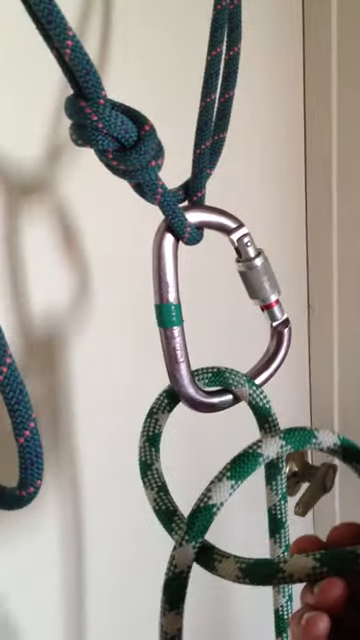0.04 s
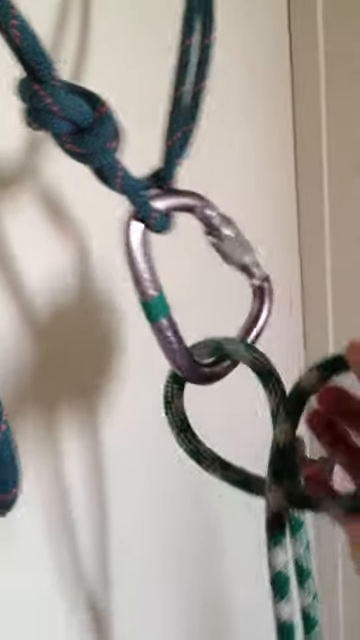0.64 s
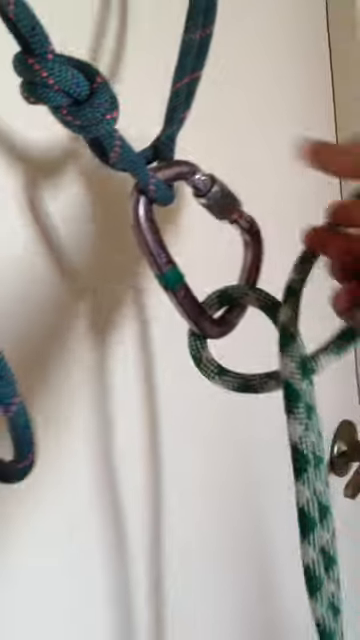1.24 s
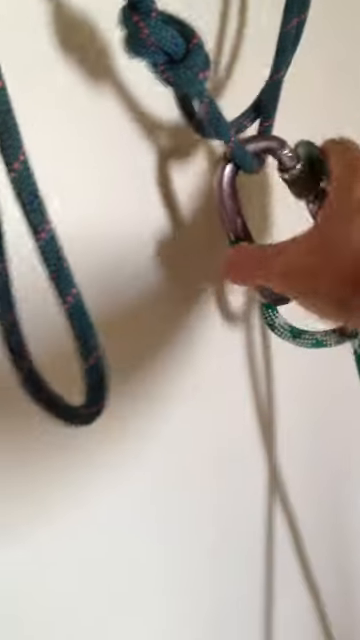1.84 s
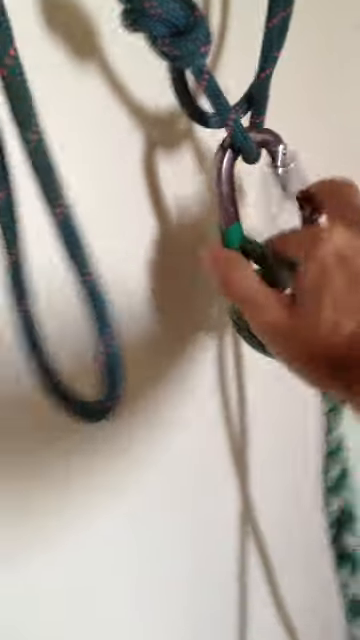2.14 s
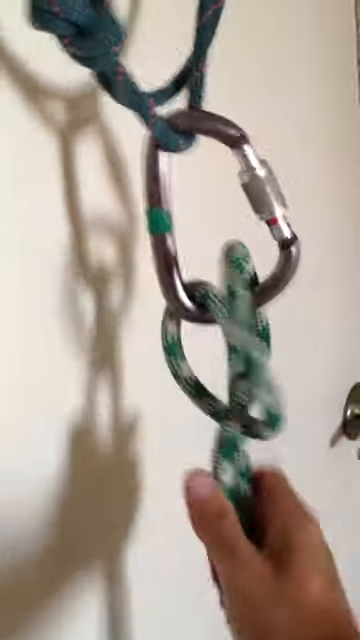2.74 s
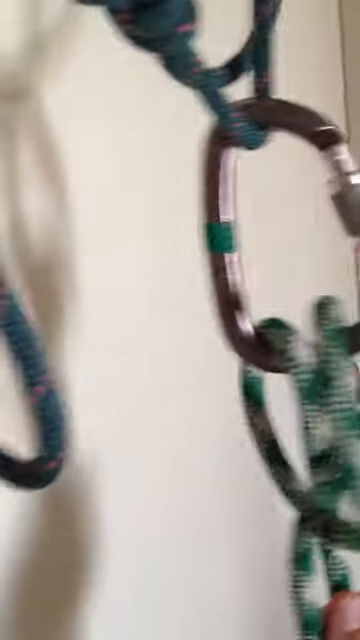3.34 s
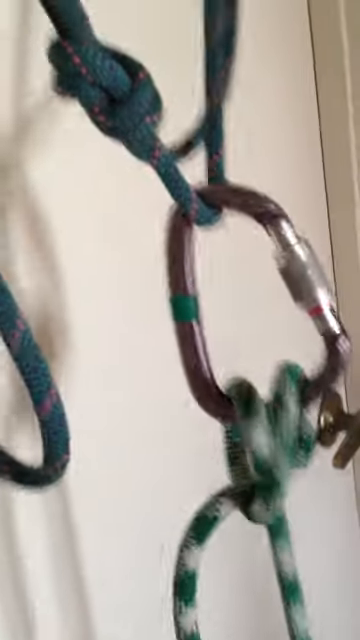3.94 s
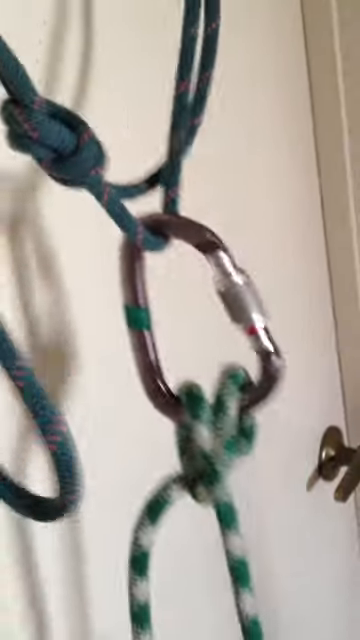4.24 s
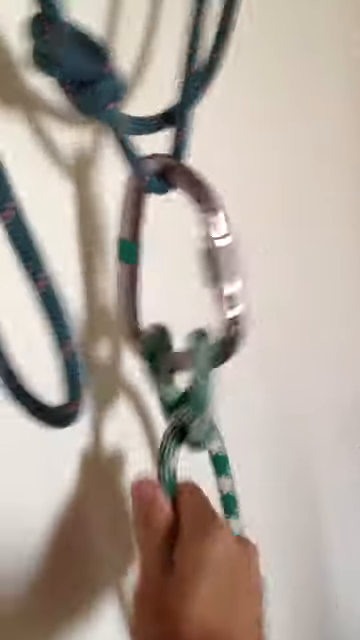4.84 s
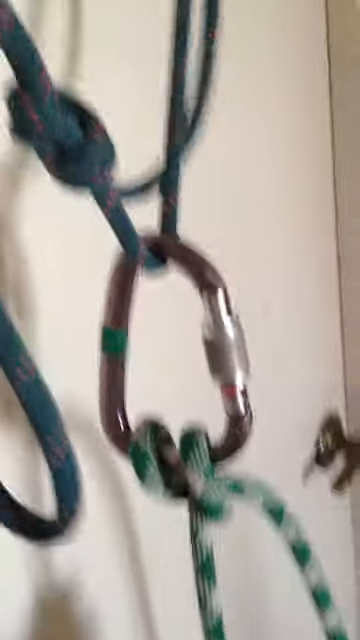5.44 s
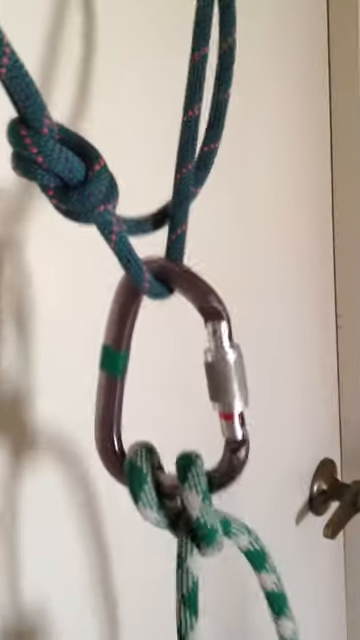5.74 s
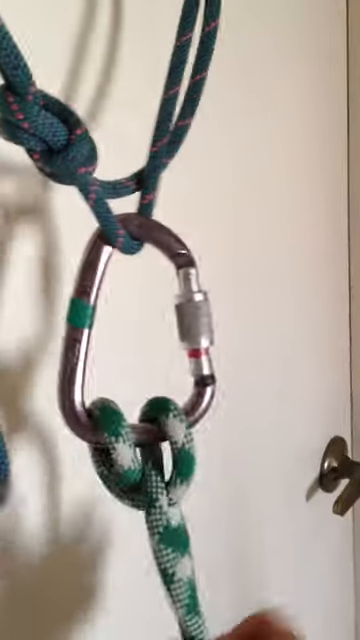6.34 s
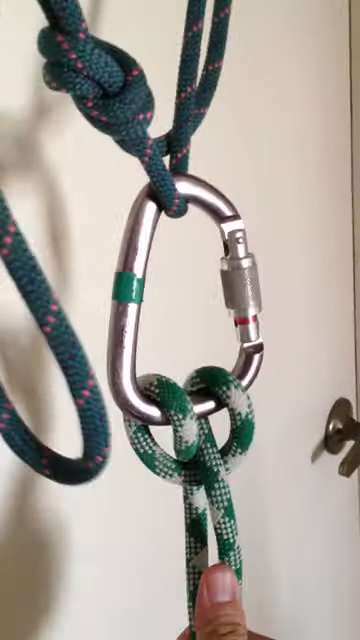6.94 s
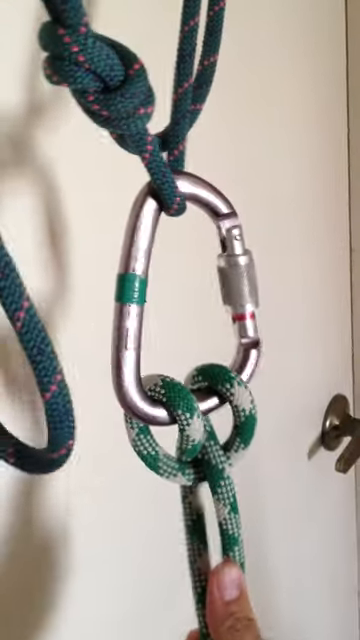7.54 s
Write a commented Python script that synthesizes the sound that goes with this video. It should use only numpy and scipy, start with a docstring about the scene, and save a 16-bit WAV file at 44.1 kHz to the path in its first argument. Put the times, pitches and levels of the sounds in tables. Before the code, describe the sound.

One loud, bright snap of a carabiner closing, amid faint rope sliding and light bumps on a wooden door in a quiet room.

```python
"""Hitching a rope to a carabiner

A rope is tied into a metal carabiner that hangs against a door in a small, quiet room.
The rope hisses over the metal, rustles in the hand, and scrapes and slaps the door. The metal clinks.
Once, close by, the spring gate snaps shut, and an automatic gain control turns the room noise
down for about a second."""
import sys
import numpy as np
from scipy import signal
from scipy.fft import rfft, irfft
from scipy.io import wavfile
from scipy.ndimage import uniform_filter1d, minimum_filter1d

SR = 44100
rng = np.random.default_rng(int(sys.argv[2]) if len(sys.argv) > 2 else 0)


def wrap_up_sound(samples):
    """Save the sound to the file named by the first command line argument, as 16-bit audio."""
    columns = np.atleast_2d(samples).T
    # keep every value between -1 and 1, then stretch to whole-number steps
    tamed = np.clip(columns, -1, 1)
    steps = np.round(tamed * 32767).astype(np.int16)
    wavfile.write(sys.argv[1], SR, steps)


N = 340011
TIME = np.arange(N) / SR
RING_TIME = TIME[:SR // 2]  # half a second, for short sounds


def gain_of(db):
    return 10 ** (np.asarray(db) / 20)


def unit_level(x):
    """Scales a sound to an average power of 1."""
    return x / np.sqrt(np.mean(x ** 2) + 1e-20)


def look_up(table, hz):
    """Reads between a table's rows, along a musical (log) pitch scale."""
    pitch_hz, value = np.transpose(table)
    return np.interp(np.log(hz + 1), np.log(pitch_hz + 1), value)


def add(mix, start_s, sound):
    part = mix[round(start_s * SR):][:len(sound)]
    part += sound[:len(part)]


def coloured(x, tone):
    """Makes each pitch stronger or weaker as a tone table says; the result has power 1."""
    gains = gain_of(look_up(tone, np.fft.rfftfreq(len(x), 1 / SR)))
    return unit_level(irfft(rfft(x) * gains, len(x)))


def keep_side(x, hz, side, order=2):
    """Keeps the "low" or the "high" side of a pitch."""
    return signal.sosfilt(signal.butter(order, min(hz, SR / 2 - 1), side, fs=SR, output="sos"), x)


def dying(decay_s):
    """A fade that loses 60 dB in decay_s."""
    return np.exp(-np.log(1000) * RING_TIME / decay_s)


def ring(notes):
    """A struck object sounds several fading notes at once."""
    return sum(gain_of(db) * dying(decay_s) * np.sin(2 * np.pi * hz * RING_TIME)
               for hz, db, decay_s in notes)


def scatter(spacing=8):
    """Dense tiny echoes: one click, up or down at random, in every few samples."""
    clicks = np.zeros(len(RING_TIME))
    slots = np.arange(0, len(clicks) - spacing, spacing)
    clicks[slots + rng.integers(0, spacing, len(slots))] = rng.choice([-1., 1.], len(slots))
    return unit_level(clicks)


def slips(per_s, spread_db):
    """Rubbing: tiny random slips of uneven size."""
    size = gain_of(spread_db * np.minimum(rng.exponential(1, N), 4))
    return unit_level(size * rng.standard_normal(N) * (rng.random(N) < per_s / SR))


def stroke(start_s, length_s, end_db, swell_db, fade_s, attack_s=.035):
    """Loudness of one rope move: it starts, swells to end_db, then loses 20 dB every fade_s."""
    t = np.maximum(TIME - start_s, 0)
    swelling_db = swell_db * (np.minimum(t / length_s, 1) - 1)
    fading_db = 20 * np.maximum(t - length_s, 0) / fade_s
    return np.minimum(t / attack_s, 1) * gain_of(end_db + swelling_db - fading_db)


# Tone of the room noise: pitch_hz, level_db
NOISE_TONE = [(20, -51), (55, -33.5), (85, -21), (120, -8.5), (200, -8), (290, -11), (460, -11.5),
              (900, -15), (1500, -19.5), (3000, -22.5), (8000, -24), (10000, -31.5), (13000, -24.5),
              (15300, -25)]
# Pitches that stand out in it: pitch_hz, width_hz, level_db
NOISE_PEAKS = [(202.68, 18, -76.5), (243.24, 40, -74), (344.7, 29, -81), (388.97, 18, -79),
               (630.4, 22, -82), (4600, 260, -90)]
def room_noise(level_db=-69.5):
    """Steady room noise and microphone hiss, with a few broad resonances."""
    out = gain_of(level_db) * coloured(rng.standard_normal(N), NOISE_TONE)
    hz = np.fft.rfftfreq(N, 1 / SR)
    for pitch_hz, width_hz, db in NOISE_PEAKS:
        peak = rfft(rng.standard_normal(N)) / (1 + ((hz - pitch_hz) / width_hz) ** 2)
        out += gain_of(db) * unit_level(irfft(peak, N))
    return out


# How long the room echoes: pitch_hz, decay_s
ECHO_TIMES = [(250, .52), (1000, .47), (2500, .44), (4600, .52), (8000, .47), (14000, .46)]
def room_decay(x):
    """The room lets each pitch die away at its own speed."""
    hz, t, bands = signal.stft(x, SR, nperseg=256)
    fade = np.exp(-np.log(1000) * t / look_up(ECHO_TIMES, hz)[:, None])
    return signal.istft(bands * fade, SR, nperseg=256)[1][:len(x)]


# Tone of the shaking rope: pitch_hz, level_db
THRUM_TONE = [(35, -45), (68, -8), (110, -2), (180, -1), (260, -5), (500, -31), (2000, -70)]
def rope_thrum(pulling, pull_db=-10.5, lag_s=.015, knock_db=-17.5, heavy_hz=170):
    """The rope hums low just after each pull, and when a knock on the door jolts it."""
    loudness = gain_of(pull_db) * np.interp(TIME - lag_s, TIME, pulling)
    for start_s, db, low_hz, *_ in DOOR_KNOCKS:
        lighter_db = 15 * np.log2(low_hz / heavy_hz)  # higher, lighter knocks shake it less
        add(loudness, start_s, gain_of(db + knock_db - lighter_db) * dying(decay_s=.33))
    return coloured(rng.standard_normal(N), THRUM_TONE) * loudness


# Pulls over the metal: start_s, length_s, end_db, swell_db, fade_s, tightness (0 to 1)
ROPE_PULLS = [(0.362, 0.1888, -74.5, -1.5, 0.3521, 0.26), (1.415, 0.02864, -63.5, 4, 0.1194, 0.2),
              (1.481, 0.339, -76, 2.5, 0.233, 0.07), (2.035, 0.0508, -50.5, 15, 0.1529, .3),
              (2.72, .04, -74, 2, 0.1735, .2), (3.424, 0.4566, -61.5, 7, 0.1151, 0.53),
              (3.865, 0.12997, -57, -2, 0.04, .42), (4.27, .12, -75, 2.5, 0.0491, .1),
              (4.689, 0.036, -68.5, 2, 0.3443, 0.23), (4.846, 0.1022, -64.5, 4.5, 0.134, 0.28),
              (5.05, 0.0977, -58, 13, 0.2238, 0.67), (5.249, 0.09605, -66.5, 0, 0.0369, 0.92),
              (6.84, .06, -74, 3, 0.0019, .2)]
# Tone of the rope's woven cover sliding: pitch_hz, level_db
SLIDE_TONE = [(50, -26.5), (120, -12.5), (250, -13), (700, -7.5), (1800, -3), (3000, -1.7257), (4600, 1),
              (5400, -1), (7150, 1.5), (7600, 5.5), (8700, 1), (10000, -5.5), (12000, -1.5), (15300, -2.5)]
# The hand gathering rope: start_s, length_s, end_db, swell_db, fade_s
HAND_MOVES = [(0.781, 0.2258, -68, 10.5, 0.4446), (1.118, 0.0572, -69.5, 2, 0.4648),
              (1.5, .3, -77.5, 2, 0.4014), (2.03, .055, -57.5, 12, 0.1417), (2.74, .14, -78, 1, 0.1482),
              (3.552, 0.3302, -69.5, 4.5, 0.0133), (4.48, 0.1957, -72, 0, .2),
              (5.62, .13, -68.5, 7, 0.3791), (6.399, 0.0869, -70.5, 2, 1.2716),
              (7.54, .16, -76.5, 2.5, 0.5187)]
# Tone of that rustle: pitch_hz, level_db
RUSTLE_TONE = [(100, -8.5), (350, 10), (900, -4.5), (2200, -1), (3500, -7.5), (4600, -5), (8000, -8.5),
               (10000, -13.5), (15000, -19.5)]
def rope(uneven_db=1.1955, slack_hz=7986, tight_hz=6700):
    """Slack rope hisses over the metal, tight rope rasps lower; it also rustles and thrums."""
    pull_power = np.array([stroke(*row[:-1]) for row in ROPE_PULLS]) ** 2
    tightness = np.clip([row[-1] for row in ROPE_PULLS], 0, 1)
    handling = np.linalg.norm([stroke(*row) for row in HAND_MOVES], axis=0)
    catching = unit_level(keep_side(rng.standard_normal(N), 35, "low"))  # the weave grips and lets go
    fibres = coloured(slips(per_s=18000, spread_db=1.3), SLIDE_TONE)
    weave = coloured(slips(per_s=9000, spread_db=2.2), SLIDE_TONE)
    rustle = coloured(slips(per_s=6000, spread_db=2.5), RUSTLE_TONE) * handling
    hiss = unit_level(keep_side(fibres, slack_hz, "high")) * np.sqrt((1 - tightness) @ pull_power)
    rasp = unit_level(keep_side(weave, tight_hz, "low")) * np.sqrt(tightness @ pull_power)
    thrum = rope_thrum(np.sqrt(pull_power.sum(0)))
    return gain_of(uneven_db * catching) * (hiss + rasp + rustle) + thrum


# The door's own notes: pitch_hz, level_db, decay_s
DOOR_NOTES = [(239, -3, 0.11), (343, -3, 0.14), (493.03, -3, .14), (657, -2, .12), (712.47, -1, .1),
              (1200, -13, .05), (1560, -5, .06), (1310, 4.5, .065), (1640.8, -3, .08), (2107, -7, 0.06),
              (2290, -8, .1), (2466, -9, .11), (2853, -10, .1), (3494, -14, .07)]
def door_ring():
    """The wooden panel rings briefly when touched."""
    return ring(DOOR_NOTES)


# Rope dragging on the door: start_s, length_s, end_db, swell_db, fade_s, first_brightness_hz
DOOR_DRAGS = [(0.253, 0.03412, -62.5, 12.5, 0.1344, 1152), (4.733, 0.0314, -57, 3, 0.0519, 2596),
              (4.858, .06, -52.5, -1, .09, 2750), (4.925, .028, -48.5, 8, .075, 1750)]
# Tone of rope rubbing wood: pitch_hz, level_db
SCRAPE_TONE = [(30, -50), (100, -30), (300, -0.5), (600, 6.5), (1000, 1), (2300, 1.5), (5000, -4)]
def drags(panel_db=-17, dulling_octaves_per_s=10.319, attack_s=.004906):
    """The rope sticks and slips on the door, sounding duller as it slows."""
    rubbing = slips(per_s=7000, spread_db=1)
    panel = unit_level(signal.oaconvolve(rubbing, door_ring())[:N])
    wood = coloured(rubbing, SCRAPE_TONE) + gain_of(panel_db) * panel
    out = np.zeros(N)
    for start_s, *shape, first_hz in DOOR_DRAGS:
        hz, t, bands = signal.stft(wood[round(start_s * SR):][:len(RING_TIME)], SR, nperseg=256)
        bright_hz = first_hz / 2 ** (dulling_octaves_per_s * t)
        dulling = 1 / np.sqrt(1 + (hz[:, None] / bright_hz) ** 6)
        dulling /= np.sqrt(np.mean(abs(bands) ** 2, axis=1) @ dulling ** 2)  # duller, but just as loud
        scrape = np.zeros(N)
        add(scrape, start_s, unit_level(signal.istft(bands * dulling, SR, nperseg=256)[1]))
        out += scrape * stroke(start_s, *shape, attack_s)
    return out


# Rope and carabiner hitting the door: start_s, level_db, low_hz, high_hz, decay_s, ring_db, slap_db
DOOR_KNOCKS = [(.381, -69.5, 500.4, 2401, 0.1134, -9, -22.5), (1.246, -52, 1392, 2901, 0.0181, -6, -2),
               (2.1, -30.5, 430, 2330, .082, -10.5, -10), (2.141, -48.5, 280, 1190, .07, -3, -21.5),
               (2.275, -57, 400, 1000, 0.1445, -8, -22), (2.9193, -40, 1330, 2363, 0.11104, -14, -15.5),
               (3.071, -62, 729, 970, 0.15, -17.5, -22.5),
               (4.5435, -47.5, 529.1, 1428, 0.14255, -14.5, -17),
               (4.597, -57.5, 394.8, 1158, 0.0796, 4.5, -25.5),
               (4.6891, -37, 151.3, 569.3, 0.144, -2.5, -14), (4.743, -52.5, 220, 909.8, 0.257, -8.5, -18),
               (6.3495, -34.5, 660.2, 1649, 0.1225, 2.5, -4.5)]
# Tone of rope slapping wood: pitch_hz, level_db
SLAP_TONE = [(30, -30), (90, -11), (260, 8), (800, -1.5), (1900, -1), (2400, 3), (3800, 1), (5000, -5.5),
             (7800, -10), (10000, -16.5), (15000, -19)]
def knocks(rise_s=.0005, slap_share=.73):
    """Each hit is a short slap, while the door rattles and rings between a low and a high pitch."""
    out, panel = np.zeros(N), door_ring()
    for start_s, db, low_hz, high_hz, decay_s, ring_db, slap_db in DOOR_KNOCKS:
        fade = dying(decay_s)
        above_low = [keep_side(x, low_hz, "high", order=4) for x in (scatter() * fade, panel)]
        rattle, notes = [unit_level(keep_side(x, high_hz, "low", order=3)) for x in above_low]
        slap = unit_level(coloured(scatter(), SLAP_TONE) * dying(slap_share * decay_s))
        blow = rattle + gain_of(ring_db) * notes + gain_of(slap_db) * slap
        blow *= 1 - np.exp(-RING_TIME / rise_s)  # rope gives a little on contact
        add(out, start_s, gain_of(db) * unit_level(blow) * np.sqrt(np.mean(fade ** 2)))
    return out


# The carabiner's own notes: pitch_hz, level_db, decay_s
METAL_NOTES = [(7180, -2, .03), (7390, 0, .04), (8446, -8, .065), (9157, -9, .035), (9680, -10, .04),
               (10600, -14, .035), (11300, -13, .04), (13260, -11, .05), (14250, -14, .05),
               (15150, -7, .05)]
# Light touches on the metal: start_s, ring_db, tick_db
METAL_TOUCHES = [(.384, -65.5, -76.5), (1.44, -81.5, -67.5), (1.8686, -51, -61), (2.1226, -47, -39.5),
                 (4.079, -79, -51), (4.689, -56, -48), (5.0056, -70, -62), (5.339, -84, -59),
                 (6.45, -70, -64), (7.58, -72, -67)]
# Tone of a dry tick: pitch_hz, level_db
TICK_TONE = [(500, -16), (1700, -9), (2500, 0), (4700, 0), (8000, -4), (10000, -6.5), (14000, -6.5)]
def clinks(tick_decay_s=.019):
    """Each touch makes a dry tick and sets the carabiner ringing."""
    out, body = np.zeros(N), ring(METAL_NOTES)
    for start_s, ring_db, tick_db in METAL_TOUCHES:
        tick = coloured(scatter(spacing=4), TICK_TONE) * dying(tick_decay_s)
        add(out, start_s, gain_of(ring_db) * body + gain_of(tick_db) * tick)
    return out


# The gate closing, first a graze and then the full blow: start_s, level_db
GATE_HITS = [(2.1913, -19.5), (2.1924, -1.5)]
# Very short notes of the gate hitting the carabiner's tip: pitch_hz, level_db, decay_s
GATE_NOTES = [(2300, -14, 0.005), (2870, -10, 0.0086), (4720, -6.5, 0.0061), (6298.4, -7, 0.0033),
              (7230, -5.5, .007), (7460, -6, .007), (11250, -14.5, .012), (13300, -11.5, .014),
              (13650, -9.5, .013), (14880, -11.5, .01)]
# Tone of the snap's spray of many high notes: pitch_hz, level_db
SPRAY_TONE = [(60, -46), (250, -26.5), (1250, -25.5), (1550, -12), (3000, -9.5), (4700, -3.5), (6100, -5),
              (7550, 3.5), (8600, -2.5), (10600, -6.5), (11150, 2), (12200, -2), (13600, 1), (15300, -1.5)]
# Tone of the snap as the room sends it back: pitch_hz, level_db
SNAP_ECHO_TONE = [(60, -24.5), (300, 1), (1200, -5), (3500, 5), (6000, 0), (7500, 8), (9500, -3.5),
                  (14000, -0.5)]
def gate_snap(crack_db=3, ring_db=-26, bounce_s=.0077, bounce_db=-12, room_db=-34, push_db=7):
    """The gate springs shut: a crack, a bright spray, the room's echo and a low push of air."""
    (graze_s, graze_db), (blow_s, blow_db) = GATE_HITS
    crack = gain_of(crack_db) * ring(GATE_NOTES)
    blow = crack + gain_of(ring_db) * ring(METAL_NOTES)
    # a small surface nearby bounces back only the treble
    add(blow, bounce_s, gain_of(bounce_db) * keep_side(crack, 4000, "high"))
    spray_fade = gain_of(-11) * dying(decay_s=.064) + gain_of(-19) * dying(decay_s=.2)
    blow += coloured(scatter(spacing=4), SPRAY_TONE) * spray_fade
    blow += gain_of(room_db) * room_decay(coloured(scatter(), SNAP_ECHO_TONE))
    # the microphone's bass cut makes a one-way pulse of air swing back and forth
    pulse = keep_side(-np.exp(-RING_TIME / .0018), 1300, "low")
    push = keep_side(pulse, 170, "high", order=4)
    add(blow, .0002, gain_of(push_db) * push)
    out = np.zeros(N)
    add(out, graze_s, gain_of(graze_db) * crack)
    add(out, blow_s, gain_of(blow_db) * blow)
    return out


def scene(far_echo_db=-14, near_echo_db=-19):
    """Mixes everything in the room; the metal is nearer than the door, so it echoes less."""
    near = clinks()
    far = keep_side(knocks() + drags() + rope(), 55, "high")
    tail = room_decay(scatter(spacing=16)) * (RING_TIME > .007)  # echoes begin after 7 ms
    into_room = gain_of(far_echo_db) * far + gain_of(near_echo_db) * near
    echoes = signal.oaconvolve(into_room, tail / np.linalg.norm(tail))[:N]
    return (near + far + echoes + gate_snap() + room_noise())[None]


def record(dry, limit_db=-14, hold_s=.32134, recover_s=.61936, ceiling=.93, top_hz=15300):
    """A loud sound drops the gain, which waits and creeps back; peaks and top treble are trimmed."""
    power_db = 10 * np.log10(abs(uniform_filter1d(dry[0] ** 2, size=220)) + 1e-12)
    hold = int(hold_s * SR)
    needed_db = np.minimum(limit_db - power_db, 0)
    held_db = -minimum_filter1d(needed_db, hold, origin=(hold - 1) // 2)
    release = np.exp(-TIME / recover_s)
    drop_db = np.maximum.accumulate(held_db / release) * release
    turned_down = dry / gain_of(uniform_filter1d(drop_db, size=40))
    rounded = ceiling * np.tanh(turned_down / ceiling)
    treble_cut = signal.firwin(511, top_hz, window=("kaiser", 9), fs=SR)
    return signal.oaconvolve(rounded, treble_cut[None], "same")


dry = scene()
out = record(dry)
wrap_up_sound(out)
```